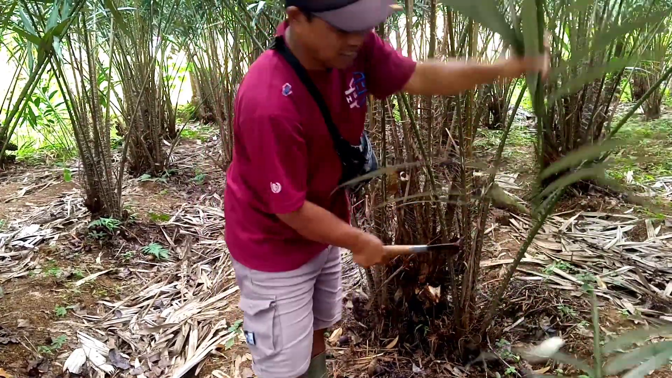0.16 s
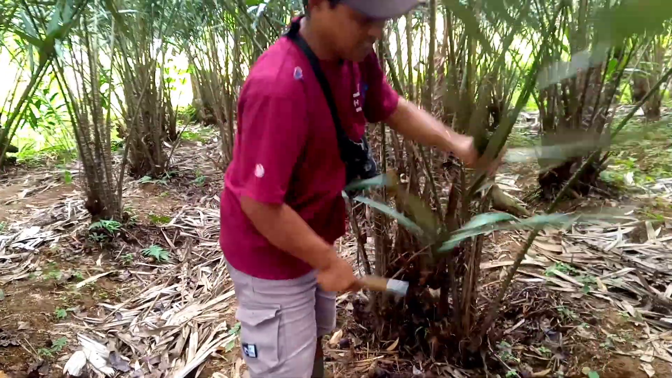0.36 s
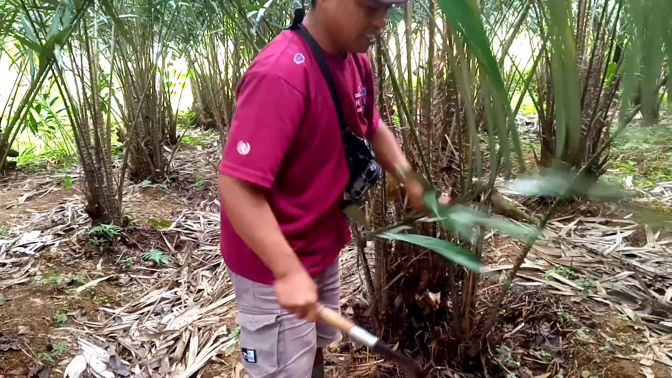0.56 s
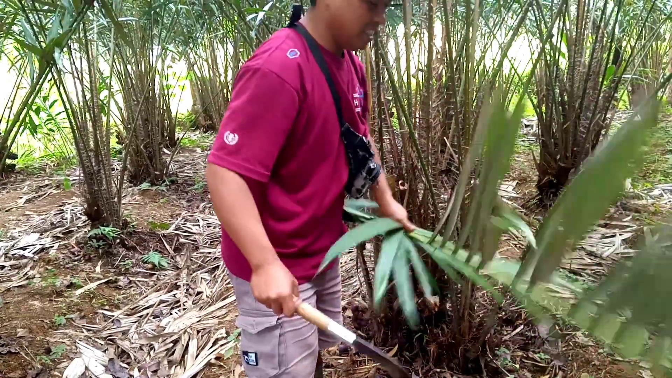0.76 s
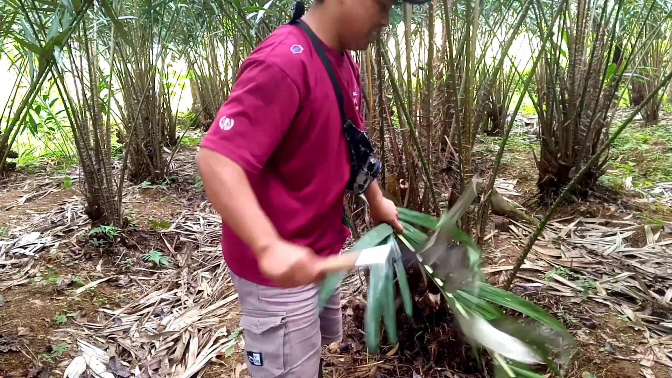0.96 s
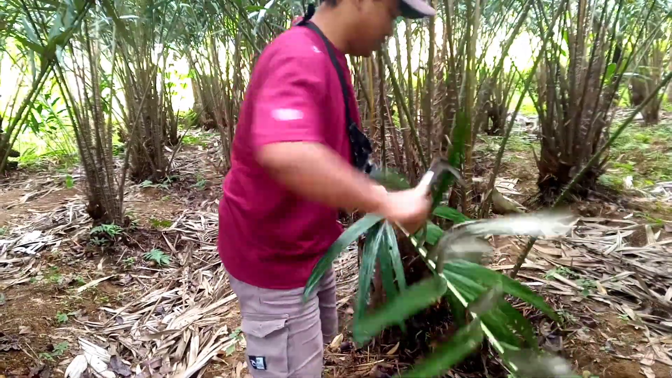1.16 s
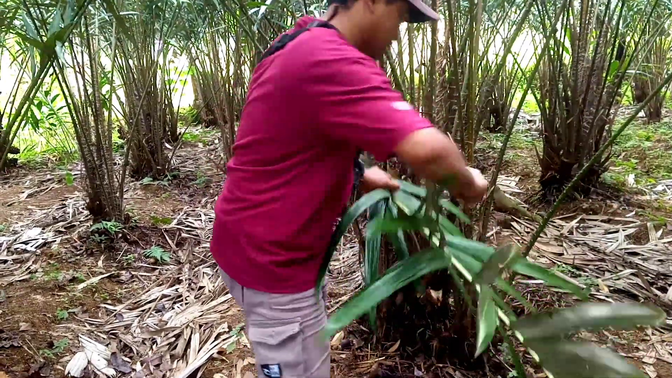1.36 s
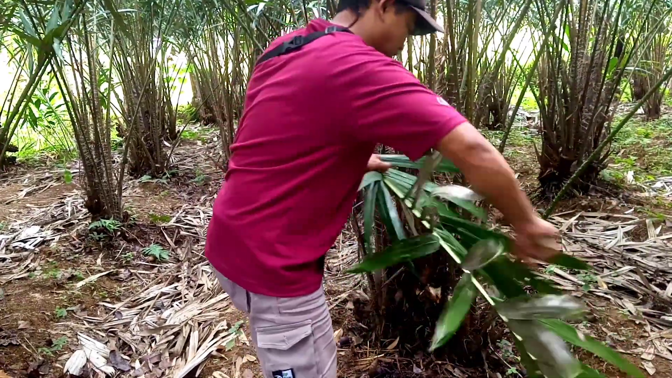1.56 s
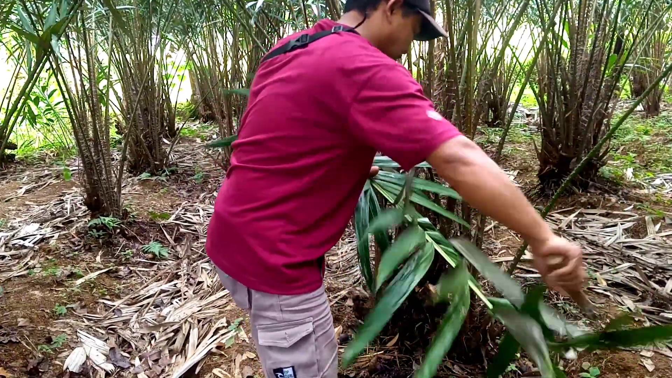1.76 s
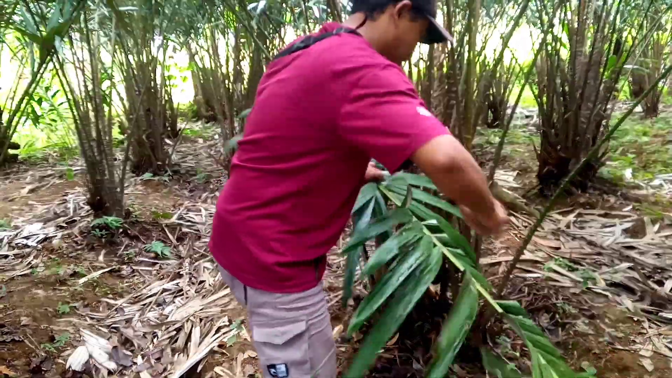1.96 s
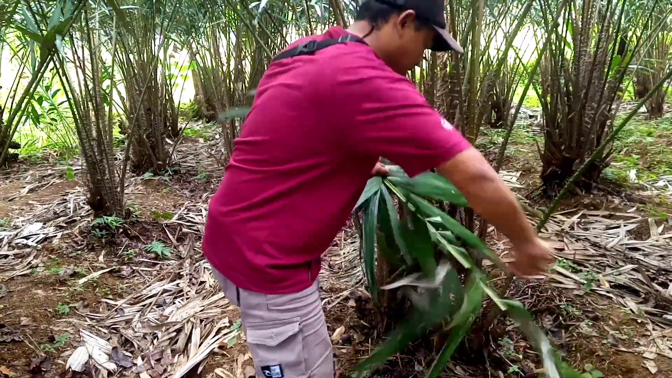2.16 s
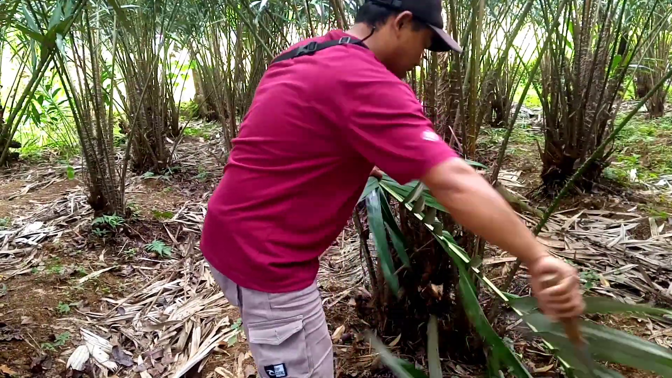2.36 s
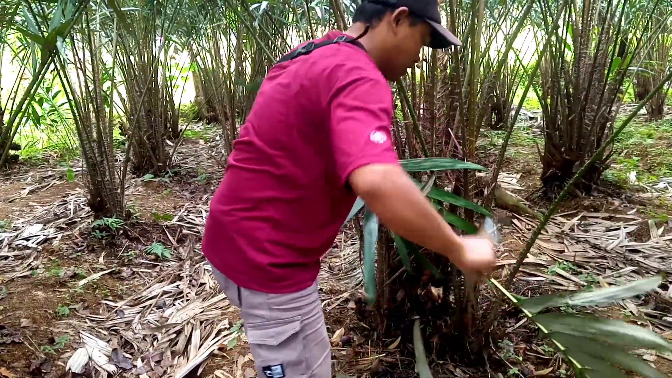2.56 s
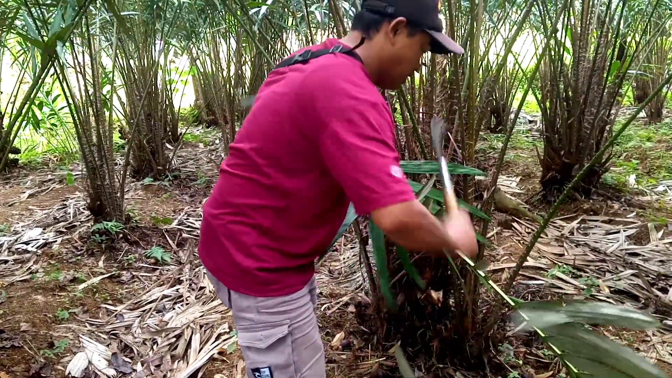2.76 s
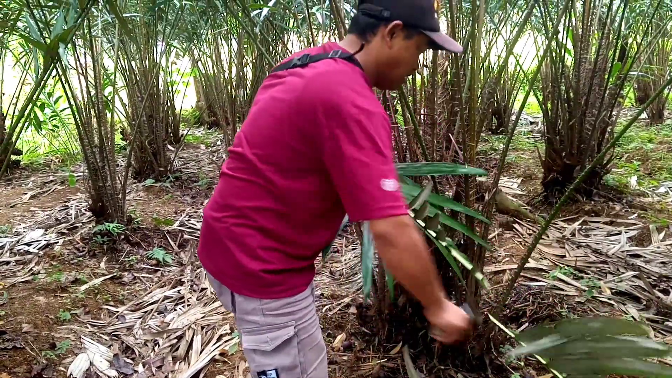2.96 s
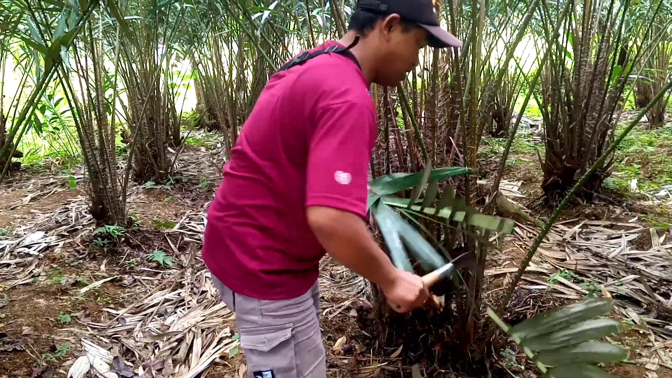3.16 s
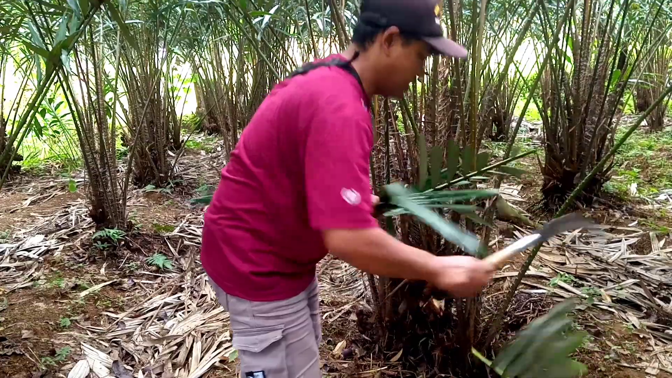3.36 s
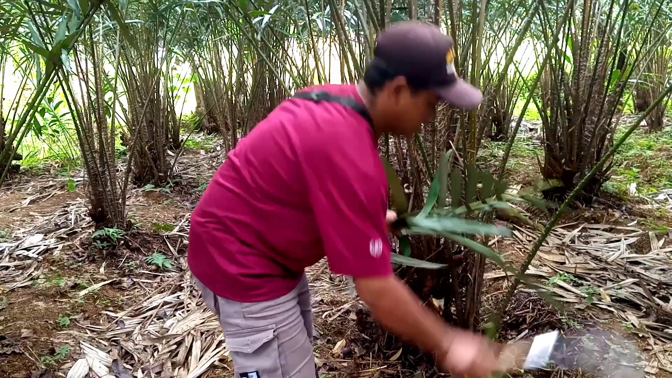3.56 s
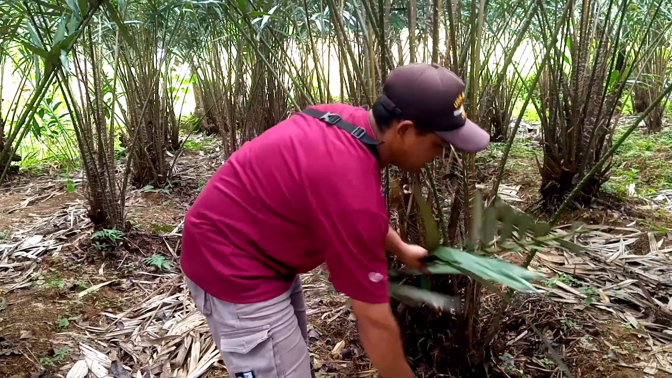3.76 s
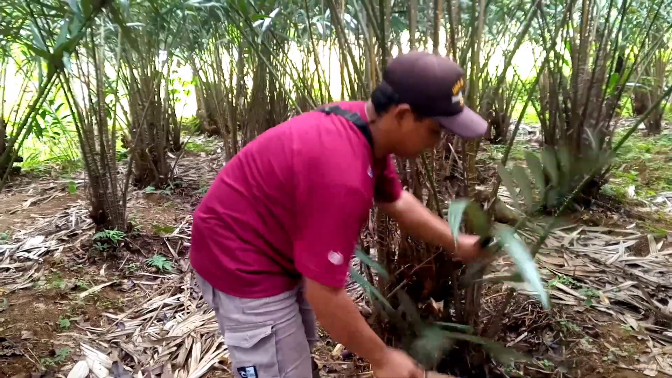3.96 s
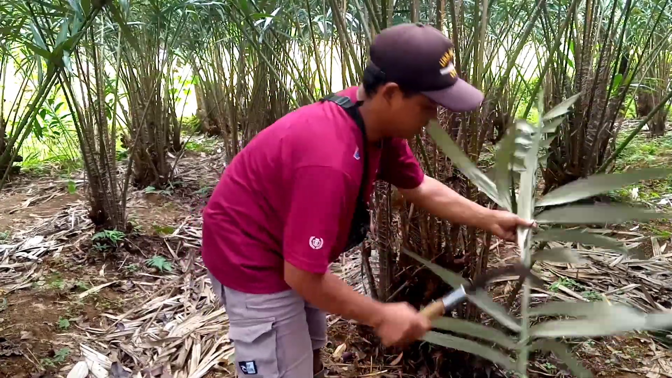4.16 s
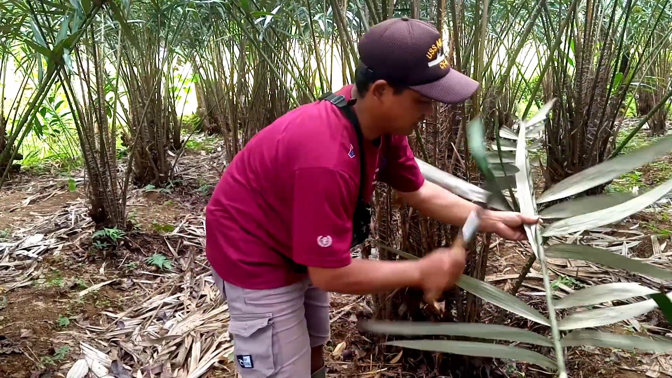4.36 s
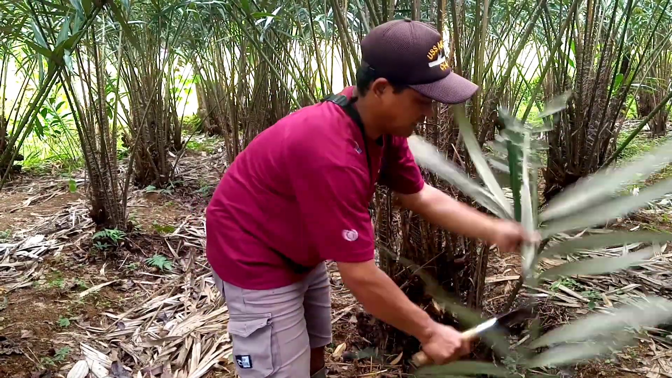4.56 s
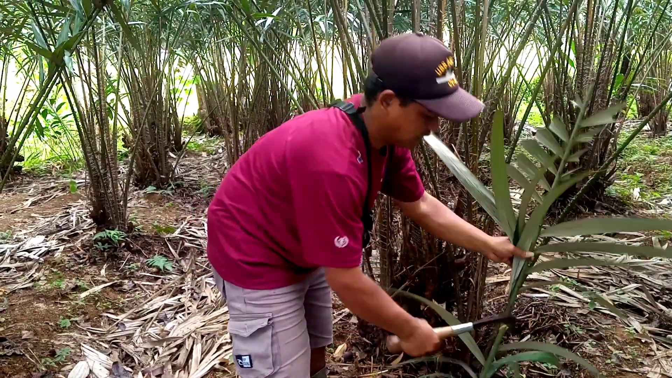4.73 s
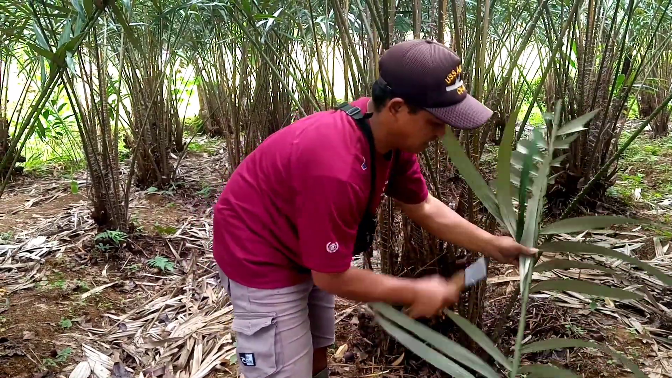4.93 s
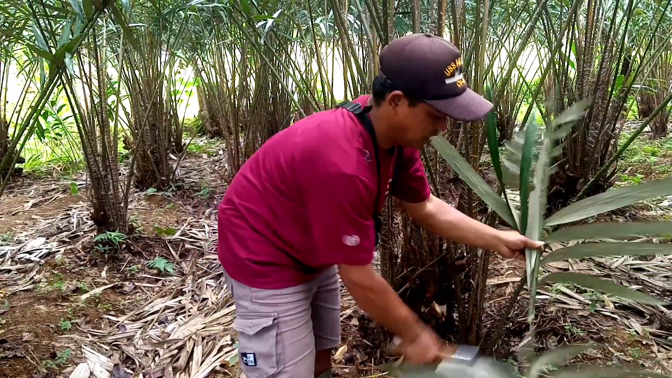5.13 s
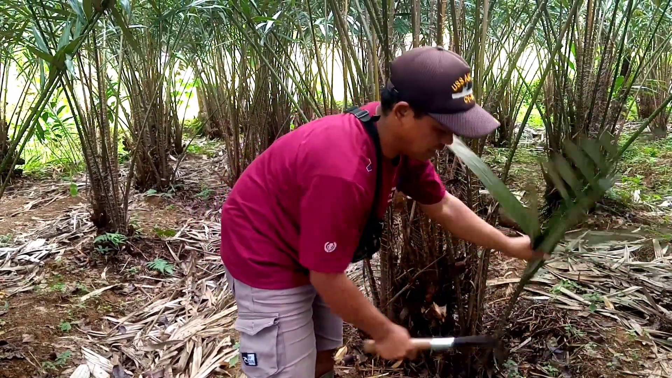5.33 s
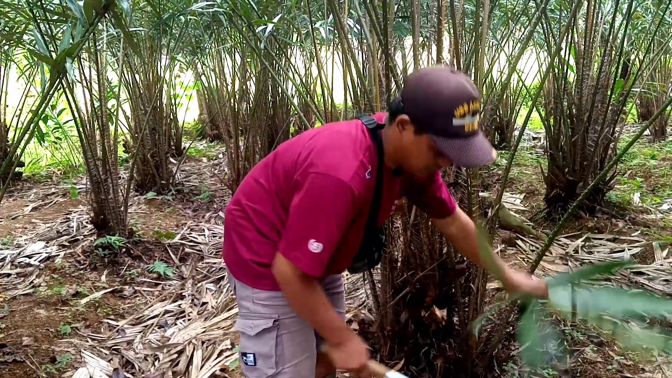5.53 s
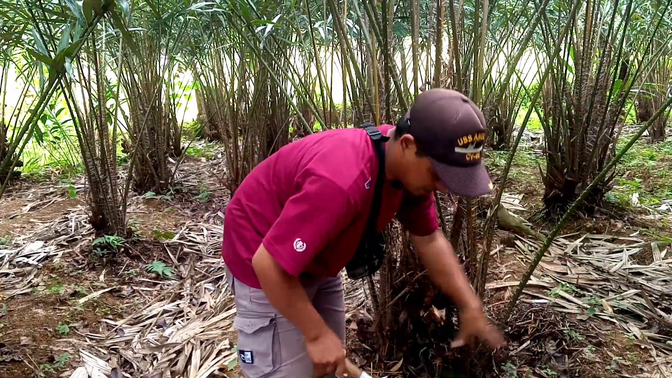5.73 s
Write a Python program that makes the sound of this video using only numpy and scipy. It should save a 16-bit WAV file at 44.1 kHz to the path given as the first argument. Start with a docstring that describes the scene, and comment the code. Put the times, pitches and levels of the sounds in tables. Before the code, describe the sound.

A sickle slits rustling palm leaves and cracks through the stalk three times, amid small snaps of spines in a quiet grove.

```python
"""A sickle trims spiny palm fronds in a grove. A frond is dragged through the clump, rustling and
ripping on spines; spines and dry leaves snap. The blade slits leaflets and chops the stalk three times,
each a crack and a dull knock, the last with a swish. Rustle, rips, snaps and cracks are swarms of
tiny fractures. Stems and leaf litter scatter the sound, over a low far-off rumble."""
import sys
import numpy as np
from scipy import signal
from scipy.fft import rfft, irfft, next_fast_len
from scipy.io import wavfile
from scipy.ndimage import uniform_filter1d

SR = 44100
rng = np.random.default_rng(int(sys.argv[2]) if len(sys.argv) > 2 else 0)


def unload_wav(signal):
    """Save mono or channel-first audio to the path in sys.argv[1] as 16-bit WAV at rate SR, clipped to [-1, 1]."""
    wavfile.write(
        sys.argv[1],
        SR,
        np.round(np.clip(np.atleast_2d(signal).T, -1, 1) * 32767).astype(np.int16),
    )


N = 255339
TIME = np.arange(N) / SR

# Far rumble and grove hush: f/Hz, relative density/dB
GROVE_SPECTRUM = [(26, -28), (52, -13), (88, -3), (122, 1), (185, -12.5), (360, -18.5), (720, -32.5),
                  (1550, -33), (4100, -30), (15500, -41)]
# Rumble contour: t/s, gain/dB
RUMBLE_GAINS = [(0, 3), (1.2, 0.5), (1.9, -8.5), (3.1, -3), (3.8, 1.5), (4.6, -4), (5.79, -1)]
# Faint far-off tones: start/s, end/s, f/Hz, level/dB
DISTANT_TONES = [(4.108, 4.51, 724, -62), (4.166, 4.402, 2580, -61)]
# Colour of a breaking fibre: f/Hz, gain/dB
FIBRE_RESPONSE = [(110, 0), (285, 4), (410, -1.5), (680, 3), (1450, -0.5), (3200, 0.5), (4500, -3.5),
                  (15500, 0)]
# Limits of the body, mid and edge registers: f/Hz
REGISTER_LIMITS_HZ = [130, 1400, 4600, 17000]
# In the event tables, body and edge are re mid; levels precede each source's own gain.
# Pushes and pulls on the frond: t/s, swell/s, t60/s, mid/dB, edge/dB
FROND_SWEEPS = [(-0.12, 0.34, 0.46, -41, 0.5), (0.26, 0.0074, 1, -37, 2), (0.315, 0.22, 1.3, -29, 1.5),
                (0.724, 0.0065, 1.1, -35.5, -18), (0.8, 0.069, 1.43, -28, 0.5),
                (1.019, 0.055, 0.28, -30, 4), (1.15, 0.04, 1.0, -35, 2), (1.32, 0.042, 3, -40, 0),
                (1.59, 0.02, 0.98, -43, 2), (1.914, 0.014, 4.9, -48.5, 1), (2.165, 0.026, 1.04, -34, 1),
                (2.5, 0.15, 2, -50.5, 4), (2.87, 0.18, 1.7, -42, 0.5), (3.27, 0.045, 2.4, -47.5, 3),
                (3.5, 0.079, 1.8, -43.5, -2), (3.61, 0.012, 1.2, -28, 2), (3.69, 0.059, 0.55, -29.5, -1.5),
                (3.795, 0.041, 0.54, -29.5, 1), (4.003, 0.005, 0.17, -35, -3),
                (4.345, 0.05, 0.34, -48.5, 1), (4.52, 0.021, 1.05, -41, -0.5),
                (4.741, 0.0069, 0.22, -39.5, -5.5), (5.245, 0.02, 0.4, -41.5, -2),
                (5.277, 0.008, 0.7, -33.5, 0), (5.52, 0.045, 2.2, -52.5, 2.5),
                (5.635, 0.1, 0.25, -31.5, 1.5), (5.766, 0.027, 0.5, -29.5, 0.5)]
# Spines, ribs and dry leaves snapping: t/s, mid/dB, edge/dB, rib f/Hz
SPINE_SNAPS = [(0.168, -38.5, -14, 2700), (0.2685, -36, -6, 3240), (0.347, -31.5, 6.5, 2500),
               (0.4287, -38, 9, 2120), (0.6514, -32.5, 4.5, 3795), (0.7169, -28, 5, 3090),
               (0.7213, -29, 8, 1840), (0.7286, -33.5, -11, 983), (0.8242, -27.5, 3, 2800),
               (1.1121, -26, -8, 2830), (1.1952, -34, 4, 2960), (1.354, -30.5, -15, 3600),
               (1.6103, -22, 0.5, 4210), (1.7325, -35.5, -20, 2930), (1.764, -43, 6.5, 4110),
               (2.035, -43, 3.5, 1990), (2.2014, -36.5, 12.5, 2730), (2.384, -37.5, 4.5, 3290),
               (2.811, -47, -3, 2180), (2.9866, -40.5, 9.5, 3970), (3.0147, -34.5, -15, 1075),
               (3.049, -36.5, 4, 3570), (3.0764, -39, 2, 3100), (3.1328, -38.5, -4, 2450),
               (3.1808, -37, 1, 3300), (3.4544, -34.5, 0.5, 2400), (3.5925, -37, 9, 3590),
               (3.6456, -29.5, 13, 2680), (3.6695, -26, -11, 1970), (3.7349, -35, 7, 3450),
               (3.884, -35.5, 5, 3300), (3.942, -43.5, 11.5, 3460), (4.0068, -36, 1, 3060),
               (4.078, -47, 7.5, 2970), (4.1775, -51.5, -7, 1374), (4.335, -51, 9, 3830),
               (4.35, -44, 11.5, 3700), (4.402, -48.5, 8.5, 3810), (4.696, -41, 3.5, 4090),
               (4.7466, -32.5, 1.5, 2936), (4.8611, -41, 0.5, 3110), (4.9323, -48, 7.5, 2960),
               (4.974, -52.5, 4.5, 3670), (5.0276, -56.5, 7.5, 2500), (5.1936, -48, 0, 3990),
               (5.2235, -47, 7, 3260), (5.2535, -39.5, 0, 3400), (5.2811, -36, 6, 2710),
               (5.396, -37, 9, 1830), (5.6211, -36.5, 5, 3000), (5.6713, -39.5, 8, 2720)]
# Strokes through leaflets: t/s, length/s, mid/dB, body/dB, edge/dB
RIP_STROKES = [(0.53, 0.015, -29.5, 2.5, -2), (0.861, 0.024, -30, -3.5, -1),
               (0.943, 0.034, -29.5, -14, -3.5), (1.063, 0.036, -32, -17, -11),
               (1.494, 0.065, -20.5, -7, 4), (1.569, 0.021, -15.5, -9, -0.5),
               (1.593, 0.0086, -20.5, -1, 3.5), (2.066, 0.035, -41, -3, 6), (2.102, 0.046, -23.5, -9.5, 8),
               (2.157, 0.012, -21.5, -13, 5.5), (2.438, 0.05, -37.5, -9.5, 8),
               (2.491, 0.024, -43.5, -16, 11), (2.8225, 0.008, -27.5, -2, 11.5),
               (3.616, 0.024, -26.5, -9.5, 2.5), (3.652, 0.021, -27, -4.5, 0.5)]
# Blade parting the stalk: t/s, mid/dB, body/dB, edge/dB, knock/dB, knock tilt/(dB/octave),
# bending mode f/Hz, bending mode level/dB
STALK_CHOPS = [(2.8333, -18.5, -2.5, 3, -16.5, -3.5, 286, -32),
               (4.5143, -20.2, -3, 1.5, -26.5, 3, 330, -29.5),
               (5.089, -17.5, -3, 2.2, -19.5, -0.8, 626, -19)]
# Higher modes of the struck stalk: f/Hz, level/dB
STALK_MODES = [(650, -9.5), (865, -4.5), (1120, -0.5), (1350, 3.5), (2030, 3.5), (2720, 5), (3380, -4),
               (3850, 0)]
# Microphone colour: f/Hz, gain/dB
MIC_RESPONSE = [(42, -4.5), (135, -0.52), (3950, 4.5), (4850, -0.5), (6050, 3), (7000, 8.5), (7550, 11.5),
                (8250, 6), (9250, -1), (11600, -7), (13100, -5), (14900, -1)]


def from_db(db):
    """Decibels to gain."""
    return 10 ** (np.asarray(db) / 20)


def unit_rms(x):
    """Scale to unit power."""
    return x / np.sqrt(np.mean(x ** 2, axis=-1, keepdims=True) + 1e-20)


def butter(x, order, hz, kind):
    """Causal Butterworth filter."""
    return signal.sosfilt(signal.butter(order, hz, kind, fs=SR, output="sos"), x)


def colour(x, response):
    """Minimum-phase filter from a table of f/Hz, gain/dB."""
    size = next_fast_len(N + SR // 2)
    size += size % 2
    hz, db = np.transpose(response)
    bins_hz = np.fft.rfftfreq(size, 1 / SR)
    gain = from_db(np.interp(np.log(bins_hz + 1), np.log(hz), db))
    cepstrum = irfft(np.log(gain))
    cepstrum[1:size // 2] *= 2
    cepstrum[size // 2 + 1:] = 0
    return irfft(rfft(x, size) * np.exp(rfft(cepstrum)))[:N]


def drift(rate_hz):
    """Smooth random wander, unit RMS."""
    return unit_rms(np.interp(TIME * rate_hz, np.arange(N), rng.standard_normal(N)))


def ring(clicks, hz, t60_s):
    """Resonator: a unit click starts a decaying unit sine."""
    radius, angle = from_db(-60 / (t60_s * SR)), 2 * np.pi * hz / SR
    return signal.lfilter([0, np.sin(angle)], [1, -2 * radius * np.cos(angle), radius ** 2], clicks + 1e-18)


def register_gains(mid_db, body_db, edge_db):
    """Gains in the order body, mid, edge."""
    return from_db([mid_db + body_db, mid_db, mid_db + edge_db])


def burst(start_s, hold_s, rise_s, t60_s):
    """Slice and envelope of a fracture that opens, runs on and dies away."""
    first = int(start_s * SR)
    age_s = TIME[:min(int((hold_s + 2 * t60_s) * SR), N - first)]
    attack = 1 - np.exp(-age_s / rise_s)
    decay = from_db(-60 * np.maximum(age_s - hold_s, 0) / t60_s)
    return slice(first, first + len(age_s)), attack * decay


def sweep(start_s, swell_s, t60_s, rest_db=-23.5):
    """Envelope of one movement: it gathers speed, then decays until friction stops it at rest_db."""
    age_s = TIME - start_s
    swell = np.clip(age_s / swell_s, 0, 1) ** 0.53
    swing = from_db(-60 * np.maximum(age_s - swell_s, 0) / t60_s)
    return swell * np.sqrt(np.maximum(swing ** 2 - from_db(rest_db) ** 2, 0))


def grove():
    """Throbbing low rumble, hush and two faint wavering tones."""
    hush = from_db(-49.5) * unit_rms(colour(rng.standard_normal(N), GROVE_SPECTRUM))
    rumble = signal.sosfiltfilt(signal.butter(2, 190, fs=SR, output="sos"), hush)
    throb_db = np.interp(TIME, *np.transpose(RUMBLE_GAINS)) + 2 * drift(30)
    out = hush + rumble * (from_db(throb_db) - 1)
    for start_s, end_s, hz, db in DISTANT_TONES:
        swell = np.sin(np.pi * np.clip((TIME - start_s) / (end_s - start_s), 0, 1))
        # many paths through the stems blur each tone into a narrow band
        out += from_db(db) * swell * unit_rms(ring(rng.standard_normal(N), hz, t60_s=45 / hz))
    return out


def fractures(rate_hz, spread_db, clump_db, ring_share, cycles, even_s, patch_db):
    """Tiny fractures, each a tick plus its leaflet's ring; three registers of unit power."""
    born = rng.random(N) < rate_hz / SR
    sizes = from_db(spread_db * np.minimum(rng.exponential(1, N), 4) + clump_db * drift(180))
    ticks = born * sizes * rng.choice([-1, 1], N)
    pitches_hz = np.geomspace(450, 13000, 32)
    leaflet = rng.integers(0, len(pitches_hz), N)
    # strain passes between leaflets, shifting the colour
    moment = (TIME * 22).astype(int)
    strain_db = patch_db * rng.standard_normal((len(pitches_hz), moment[-1] + 1))
    strained = ticks * from_db(strain_db)[leaflet, moment]
    rings = sum(ring(strained * (leaflet == k), hz, cycles / hz) * hz * (-1) ** k
                for k, hz in enumerate(pitches_hz))
    blend = np.sqrt(1 - ring_share) * unit_rms(ticks) + np.sqrt(ring_share) * unit_rms(rings)
    fibres = colour(blend, FIBRE_RESPONSE)
    bands_hz = zip(REGISTER_LIMITS_HZ, REGISTER_LIMITS_HZ[1:])
    registers = np.array([butter(fibres, 3, band, "band") for band in bands_hz])
    # the hand sets the mean power; only the fine grain is random
    power = uniform_filter1d(registers ** 2, int(even_s * SR), axis=1)
    return registers / np.sqrt(np.abs(power) + 1e-12)


def rustle():
    """Leaflets slide over each other: fine brushing plus coarser crackles."""
    power = np.zeros((3, N))
    for start_s, swell_s, t60_s, mid_db, edge_db in FROND_SWEEPS:
        body_db = -4 - 0.29 * edge_db   # thinner, brighter touch: less body
        power += np.outer(register_gains(mid_db, body_db, edge_db), sweep(start_s, swell_s, t60_s)) ** 2
    brushing = fractures(rate_hz=10000, spread_db=1.5, clump_db=2.44, ring_share=0.45,
                         cycles=12.8, even_s=0.091, patch_db=4)
    crackles = fractures(rate_hz=900, spread_db=2, clump_db=2, ring_share=0.37,
                         cycles=8.5, even_s=0.071, patch_db=1.5)
    leaves = from_db(-2.5) * brushing + from_db(-7.5) * crackles
    return np.sum(np.sqrt(power) * leaves, axis=0)


def snaps(splinters, rib_cycles=20):
    """A spine or rib gives way within milliseconds and rings briefly at its own pitch."""
    gains, ribs = np.zeros((3, N)), np.zeros(N)
    for start_s, mid_db, edge_db, hz in SPINE_SNAPS:
        body_db = 1.5 - 8 * np.log2(hz / 1000)   # thinner, higher rib: less body
        span, envelope = burst(start_s, hold_s=0.00094, rise_s=0.00018, t60_s=0.034)
        gains[:, span] += np.outer(register_gains(mid_db, body_db, edge_db), envelope)
        span, envelope = burst(start_s, hold_s=0, rise_s=0.00027, t60_s=rib_cycles / hz)
        ribs[span] += from_db(mid_db) * envelope * np.sin(2 * np.pi * hz * TIME[span])
    return from_db(2) * np.sum(gains * splinters, axis=0) + from_db(11.5) * ribs


def rips(build_db=2.5):
    """Leaflets rip, dragged past spines or slit by the blade; fibres break in clumps."""
    gains = np.zeros((3, N))
    for start_s, length_s, *levels_db in RIP_STROKES:
        span, envelope = burst(start_s, hold_s=length_s, rise_s=0.0036, t60_s=0.028)
        progress = np.clip((TIME[span] - start_s) / length_s, 0, 1)
        strain = from_db(build_db * (progress - 0.5))   # builds through the stroke
        gains[:, span] += np.outer(register_gains(*levels_db), envelope * strain)
    fibres = fractures(rate_hz=3600, spread_db=-1, clump_db=1.5, ring_share=0.4,
                       cycles=8.8, even_s=0.046, patch_db=1.5)
    return from_db(-1) * np.sum(gains * fibres, axis=0)


def cracks(splinters):
    """The blade cracks through the stalk; the jolt leaves the leaflets shivering."""
    gains = np.zeros((3, N))
    for start_s, mid_db, body_db, edge_db, *_ in STALK_CHOPS:
        levels = register_gains(mid_db, body_db, edge_db)
        span, crack = burst(start_s, hold_s=0.0026, rise_s=0.00013, t60_s=0.047)
        gains[:, span] += np.outer(levels, crack)
        span, shiver = burst(start_s, hold_s=0.014, rise_s=0.0087, t60_s=0.27)
        gains[:, span] += from_db(-17.5) * np.outer(levels, shiver)
    # a small fracture radiates little bass
    return butter(np.sum(gains * splinters, axis=0), 2, 430, "high")


def knocks():
    """The sappy stalk knocks at each chop; its bending mode depends on the length left standing."""
    out = np.zeros(N)
    for start_s, *_, knock_db, tilt_db_per_oct, bend_hz, bend_db in STALK_CHOPS:
        span, envelope = burst(start_s, hold_s=0, rise_s=0.0006, t60_s=0.023)
        for hz, db in STALK_MODES:
            mode = np.sin(2 * np.pi * (hz * TIME[span] + rng.random()))
            out[span] += from_db(knock_db + db + tilt_db_per_oct * np.log2(hz / 1000)) * envelope * mode
        span, envelope = burst(start_s, hold_s=0, rise_s=0.0015, t60_s=0.048)
        out[span] += from_db(bend_db) * envelope * np.sin(2 * np.pi * bend_hz * (TIME[span] - start_s))
    return from_db(3) * out


def swish(impact_s=5.089, swing_s=0.076):
    """Air rushes round the blade on the last, hardest swing, until the stalk stops it."""
    speed = sweep(impact_s - swing_s, swing_s, t60_s=0.02)
    air = butter(rng.standard_normal(N), 2, [550, 1300], "band")
    return from_db(-50.5) * speed * unit_rms(air)


def scatter(x, delay_s, t60_s, dull_hz, patterns=24):
    """Dense echoes off stems and litter; the pattern changes as the frond moves."""
    age_s, out = TIME[:SR // 2], np.zeros(N + SR)
    decay = (age_s > delay_s) * from_db(-60 * age_s / t60_s)
    for stretch in np.array_split(np.arange(N), patterns):
        response = rng.standard_normal(len(age_s)) * decay
        echoes = signal.fftconvolve(x[stretch], response / np.linalg.norm(response))
        out[stretch[0]:stretch[0] + len(echoes)] += echoes
    # long waves pass thin stems by; leaves absorb the shortest
    return butter(out[:N], 1, [350, dull_hz], "band")


def scene():
    """Cutting, echoes from the near clump and far grove, and background; mono."""
    splinters = fractures(rate_hz=7000, spread_db=4, clump_db=2, ring_share=0.89,
                          cycles=10.3, even_s=0.0037, patch_db=3.5)
    cutting = rustle() + rips() + snaps(splinters) + cracks(splinters) + swish()
    near = from_db(-12) * scatter(cutting, delay_s=0.0037, t60_s=0.16, dull_hz=13200)
    far = from_db(-21.5) * scatter(cutting, delay_s=0.03, t60_s=0.5, dull_hz=6350)
    return (cutting + knocks() + near + far + grove())[None]


def record(dry):
    """The microphone port rings in the treble; peaks are rounded, the top is cut."""
    ceiling, cutoff_hz = 0.7, 15700
    rounded = ceiling * np.tanh(colour(dry[0], MIC_RESPONSE) / ceiling)
    lowpass = signal.ellip(10, 0.2, 70, cutoff_hz, fs=SR, output="sos")
    return signal.sosfilt(lowpass, rounded)[None]


dry = scene()
out = record(dry)
unload_wav(out)
```